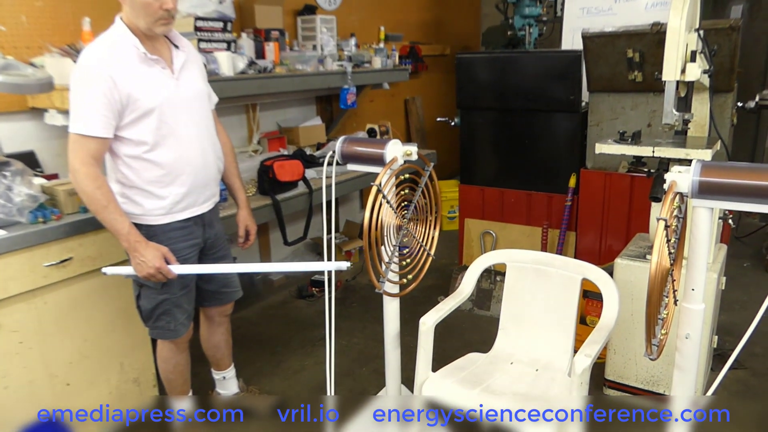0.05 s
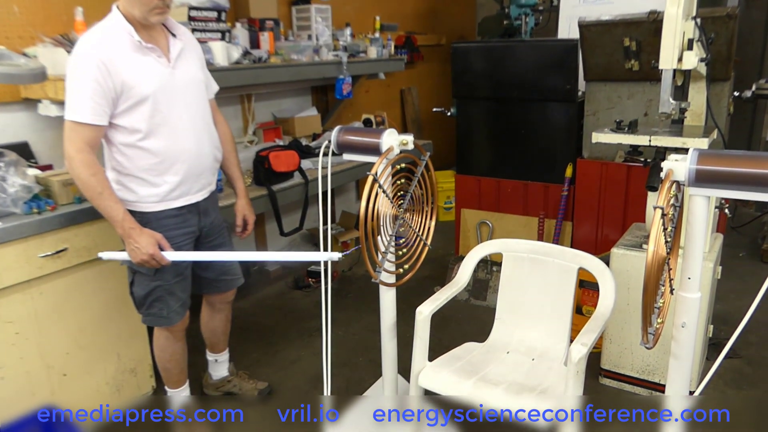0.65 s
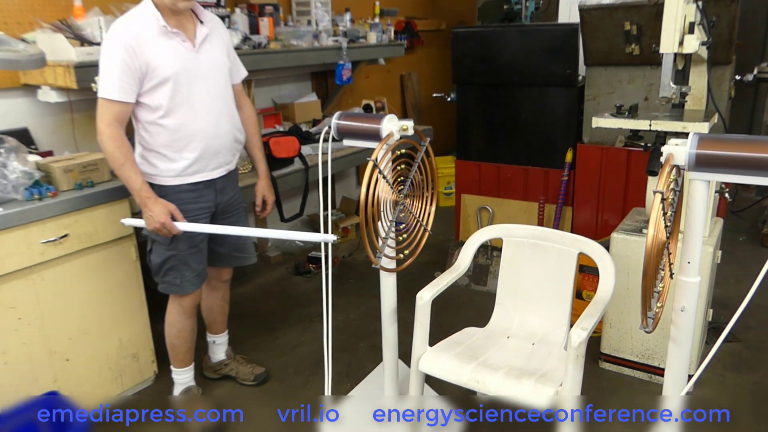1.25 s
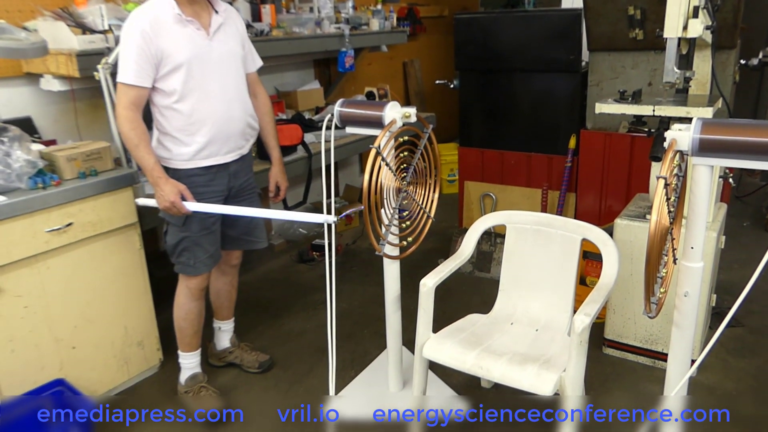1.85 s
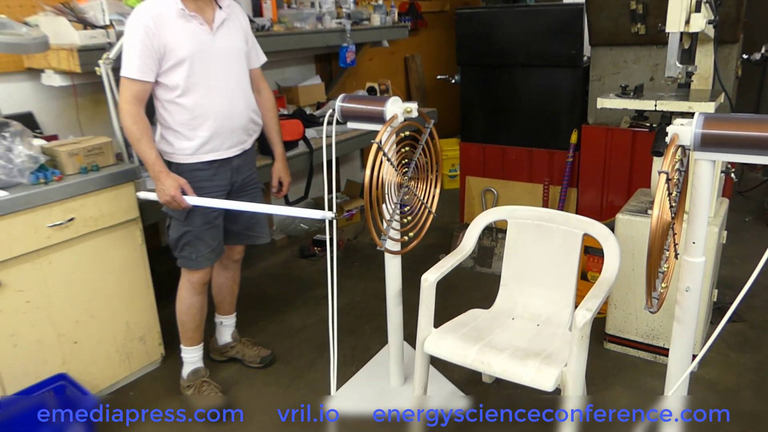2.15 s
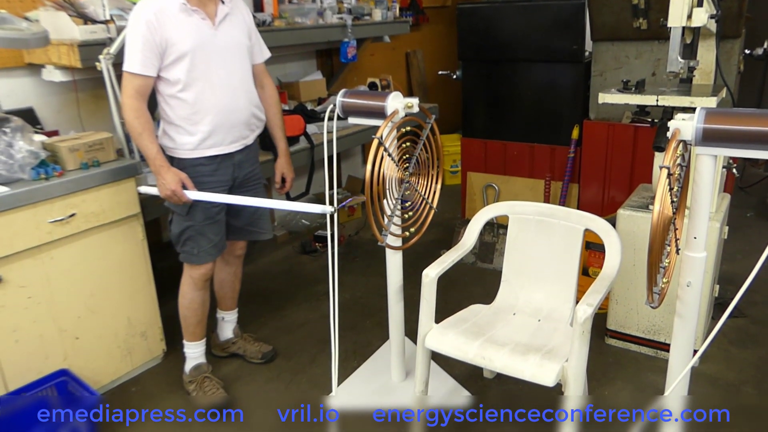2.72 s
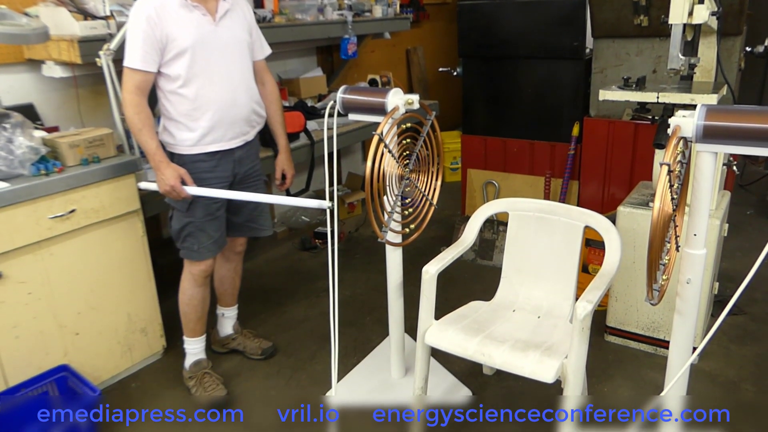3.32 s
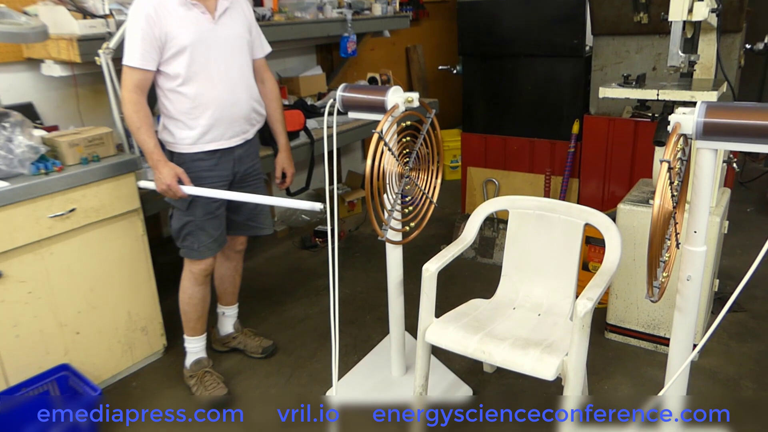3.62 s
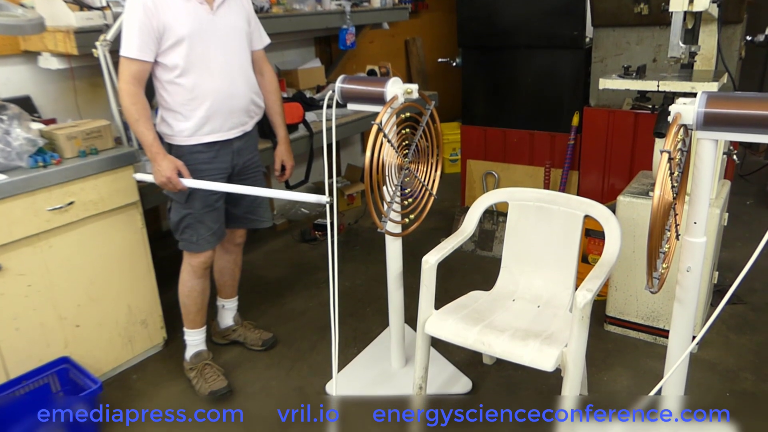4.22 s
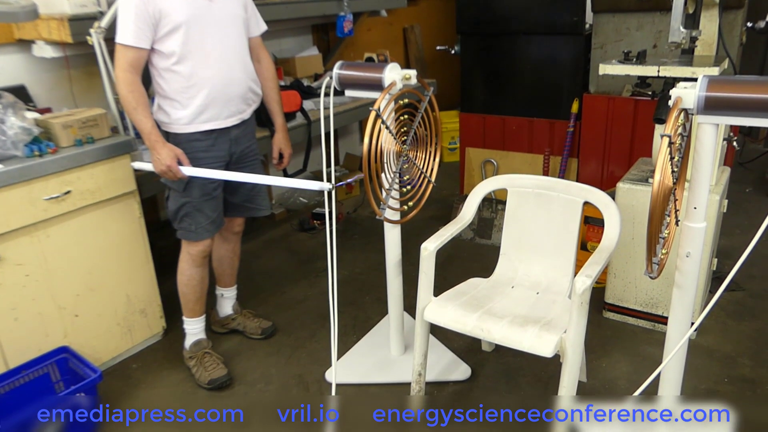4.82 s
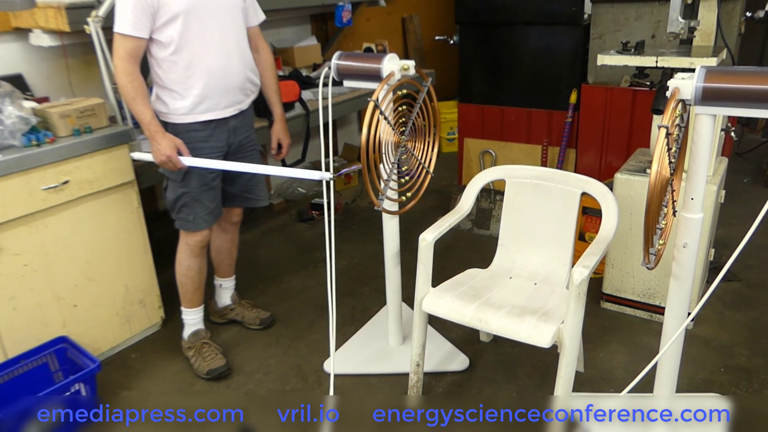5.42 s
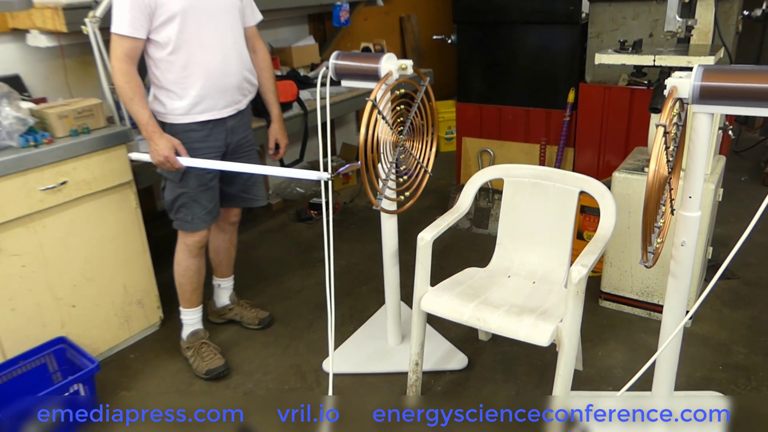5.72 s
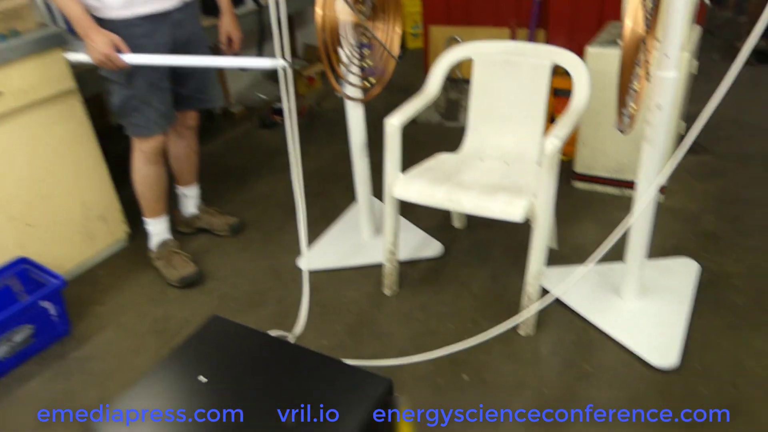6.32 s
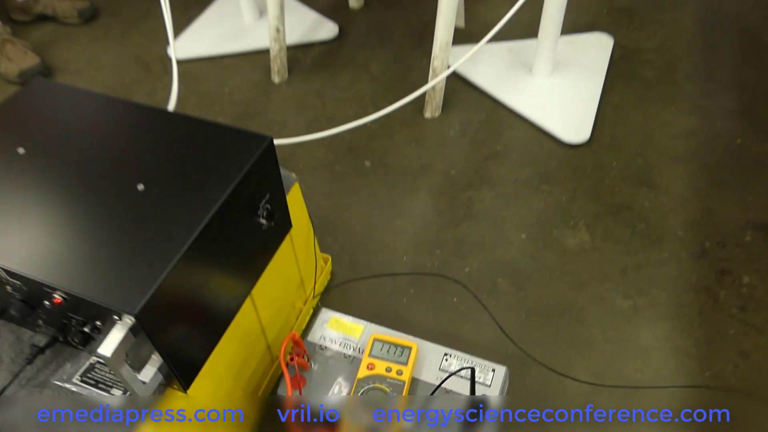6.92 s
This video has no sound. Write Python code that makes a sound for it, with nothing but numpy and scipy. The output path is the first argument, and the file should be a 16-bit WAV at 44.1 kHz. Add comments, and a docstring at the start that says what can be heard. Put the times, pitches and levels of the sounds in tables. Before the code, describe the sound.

Electric arcs sizzle and crackle in repeated bursts over a spark gap's steady hiss and a faint machine hum.

```python
"""A workshop with a spark-gap coil running. The gap hisses steadily while a hand-held tube draws sizzling
arcs from the coil: each arc strikes, burns for a moment and breaks, leaving thin streamers. The sparks
pulse with the mains and the hard room answers. A machine hums faintly, and two low bumps come just
before the last arc dies."""
import sys
import numpy as np
from scipy import signal
from scipy.fft import rfft, irfft, next_fast_len
from scipy.io import wavfile
from scipy.ndimage import uniform_filter1d, map_coordinates

SR = 44100
rng = np.random.default_rng(int(sys.argv[2]) if len(sys.argv) > 2 else 0)


def unload_wav(signal):
    """Save mono or channel-first audio to the path in sys.argv[1] as 16-bit WAV at rate SR, clipped to [-1, 1]."""
    wavfile.write(
        sys.argv[1],
        SR,
        np.round(np.clip(np.atleast_2d(signal).T, -1, 1) * 32767).astype(np.int16),
    )


N = 306495
TOP_HZ = 15720  # upper edge of the sound

# Spells with the tube near enough for thin streamers. Each row: start and end in seconds, level in dB.
STREAMERS = [(0.0, 0.945, -31), (1.236, 3.395, -34), (4.23, 6.575, -32)]


def amp(db):
    """Decibels to gain."""
    return 10 ** (np.asarray(db) / 20)


def unit(x):
    """Scale to rms 1."""
    return x / np.sqrt(np.mean(x ** 2) + 1e-20)


def clock():
    """The time of every sample, in seconds."""
    return np.arange(N) / SR


def along(points, hz):
    """Read (Hz, value) points on a log frequency axis."""
    freqs, values = np.transpose(points)
    return np.interp(np.log(hz + 1), np.log(freqs + 1), values)


def curves(rows):
    """Automation lanes: one value per sample for each column after the time."""
    times, *columns = np.transpose(rows)
    return [np.interp(clock(), times, column) for column in columns]


def wobble(rate):
    """A smooth random curve with `rate` knots a second."""
    knots = rng.standard_normal(int(N * rate / SR) + 4)
    return map_coordinates(knots, [np.arange(N) * rate / SR])


def coloured(x, db_at):
    """Causal EQ with the gain db_at(Hz), so that clicks keep their sharp front."""
    size = 2 * next_fast_len(N // 2 + SR // 4)
    cepstrum = irfft(np.log(amp(db_at(np.fft.rfftfreq(size, 1 / SR)))), size)
    cepstrum[1:size // 2] *= 2  # fold onto positive times: minimum phase
    cepstrum[size // 2 + 1:] = 0
    return irfft(rfft(x, size) * np.exp(rfft(cepstrum)), size)[..., :N]


def diffuse(size):
    """Stereo noise arriving from all around, wide in the bass and narrower higher up."""
    # Stereo image of the room. Each row: frequency in Hz, left-right correlation.
    likeness = [(60, -0.24), (150, -0.51), (350, -0.61), (700, 0.48), (1400, 0.47), (3500, 0.73),
                (8000, 0.81), (15000, 0.29)]
    correlation = np.clip(along(likeness, np.fft.rfftfreq(size, 1 / SR)), -1, 1)
    angle = np.arccos(correlation) / 2
    noise = rfft(rng.standard_normal((2, size)))
    mid, side = irfft(noise * [np.cos(angle), np.sin(angle)], size)
    return np.array([mid + side, mid - side])


def room_tail():
    """One stereo reverb tail of the cluttered room; its treble dies sooner."""
    # What the room throws back. Each row: frequency in Hz, relative level in dB.
    reflection = [(300, -2.5), (5000, -2), (9000, 0.55), (15000, -1.5)]
    # How long it rings. Each row: frequency in Hz, seconds to fall by 60 dB.
    decay = [(150, 0.33), (1000, 0.3), (4000, 0.33), (9000, 0.2), (15000, 0.2)]
    hz, t, spectrum = signal.stft(diffuse(SR // 2), SR, nperseg=256)
    fade = amp(along(reflection, hz)[:, None] - 60 * t / along(decay, hz)[:, None])
    tail = signal.istft(spectrum * fade, SR, nperseg=256)[1]
    return tail / np.linalg.norm(tail[0])


def workshop(x, wet_db, steady=.24, patterns=22):
    """Direct sound plus reverb at about equal overall power; the echo pattern shifts as sparks move."""
    hop = N // patterns + 1
    lasting = room_tail()
    wet = np.zeros((2, N + SR))
    for start in range(0, N, hop):
        tail = steady * lasting + np.sqrt(1 - steady ** 2) * room_tail()
        piece = signal.fftconvolve(x[None, start:start + hop], tail, axes=1)
        wet[:, start:start + piece.shape[1]] += piece
    return (x + amp(wet_db) * wet[:, :N]) / np.hypot(1, amp(wet_db))


def machine_hum(note_hz=265, note_trim_db=-1.0, rumble_db=-57, rumble_follows=0.29):
    """A machine's faint, wavering note over an uneven low rumble that swells with it."""
    # The machine's strength. Each row: time in seconds, level in dB.
    strength = [(0.0, -64), (1.64, -59.5), (2.24, -65), (3.54, -65), (4.53, -55.5), (4.61, -65.5),
                (6.95, -73)]
    # Tone of the rumble. Each row: frequency in Hz, relative level in dB.
    rumble_tone = [(20, -16), (60, -7), (110, 1.5), (170, -3), (300, 3), (500, -14.5), (1000, -27),
                   (4000, -39)]
    strength_db, = curves(strength)
    phase = 2 * np.pi * np.cumsum(note_hz + 1.57 * wobble(9)) / SR
    note = unit(np.sin(phase)) * amp(strength_db + note_trim_db + 1.3 * wobble(6.3))
    rumble = coloured(diffuse(N), lambda hz: along(rumble_tone, hz))
    rumble = unit(rumble * amp(2.1 * wobble(12)))
    swell_db = rumble_follows * (strength_db - strength_db.mean())
    return note + rumble * amp(rumble_db + swell_db)


def bumps(push_s=0.0004):
    """Dull low knocks, each a single push of air."""
    # The knocks. Each row: start in seconds, level in dB.
    knocks = [(6.552, -35), (6.568, -30)]
    push = np.zeros(N)
    for start, db in knocks:
        age = np.maximum(clock() - start, 0) / push_s
        push += amp(db) * np.e * age * (2 - age) * np.exp(-age)
    return workshop(push, wet_db=-6, patterns=1)


def sparks(rate, tone, scatter, spread_db, mains_db, unrest=.16, mains_hz=60):
    """Crackle: charge builds and breaks down at uneven moments, harder on each crest of the mains."""
    charge = np.cumsum(rate * np.exp(unrest * wobble(40))) / SR
    firings = np.arange(int(charge[-1]))
    late, size = rng.standard_normal((len(firings), 2)).T
    at = np.interp(firings + scatter * late, charge, np.arange(N)).astype(int)
    crest = np.cos(2 * np.pi * 2 * mains_hz * at / SR)  # two crests per cycle
    clicks = np.bincount(at, amp(spread_db * np.clip(size, -2, 2) + mains_db * crest), N)
    # the supply's power is steady, so fewer sparks are stronger sparks
    power = np.abs(uniform_filter1d(clicks ** 2, size=SR // 20))
    clicks = clicks / np.sqrt(power + 1e-9)
    return coloured(clicks - clicks.mean(), lambda hz: along(tone, hz) - 60 * (hz > TOP_HZ + 500))


def burning(start, end, attack_s=0.0011, release_s=0.0081):
    """A discharge's envelope: the channel heats up, holds and dies away after the break."""
    t = clock()
    attack = 1 - np.exp(-np.maximum(t - start, 0) / attack_s)
    return attack * np.exp(-np.maximum(t - end, 0) / release_s)


def spark_gap(whistle_db=-14.0, whistle_hz=3330, whistle_width_hz=340, build_s=.2):
    """The coil's gap fires fast and fine; an airy whistle builds in its hiss while nothing is drawn."""
    # The gap's fader. Each row: time in seconds, level in dB.
    fader = [(0, -28), (1.1, -32), (3.5, -37), (4.2, -32), (4.7, -37.5), (6.3, -36), (6.68, -39.5),
             (6.95, -37)]
    # Tone of the hiss. Each row: frequency in Hz, relative level in dB.
    hiss_tone = [(100, -33.5), (400, -9), (700, -7.5), (1200, -9), (1600, -6.5), (2600, -8.5), (3300, -3),
                 (4200, -4.5), (5800, -2.5), (8200, -5), (9500, 2.5), (11300, -1.5), (13500, 0.5),
                 (15500, -3)]
    level_db, = curves(fader)
    hiss = unit(sparks(np.full(N, 2600), hiss_tone, scatter=.5, spread_db=4.5, mains_db=1.5))
    unloaded = 1 - np.max([burning(start, end) for start, end, _ in STREAMERS], axis=0)
    step = 1 / (build_s * SR)
    build_up = signal.lfilter([step], [1, step - 1], unloaded)
    phase = 2 * np.pi * whistle_hz * clock()
    whistle = unit(wobble(whistle_width_hz) * np.cos(phase) + wobble(whistle_width_hz) * np.sin(phase))
    mix = hiss + amp(whistle_db) * build_up * whistle
    return workshop(mix * amp(level_db + 0.12 * wobble(25)), wet_db=5.0)


def discharge(strike_db=2.5, settle_s=0.058, sag_db_per_s=3.5):
    """Level and freshness of what burns hardest: an arc that flares, settles and sags, or streamers."""
    # Arcs drawn to the tube. Each row: strike and break in seconds, base level in dB.
    strikes = [(0.0, 0.113, -24), (0.169, 0.322, -23.5), (0.365, 0.443, -24.5), (0.48, 0.6, -24),
               (0.673, 0.923, -22), (1.375, 1.455, -29.5), (1.456, 1.626, -20.5), (1.648, 2.107, -21),
               (2.196, 2.34, -23.5), (2.397, 2.404, -24.5), (2.421, 2.522, -24), (2.6, 2.804, -22.5),
               (2.944, 3.046, -24), (3.101, 3.101, -23.5), (3.232, 3.344, -23.5), (4.28, 4.39, -28),
               (4.417, 4.51, -27), (4.502, 4.549, -21), (4.575, 4.66, -24.5), (4.791, 4.922, -23.5),
               (5.019, 5.215, -23.7), (5.275, 5.58, -23), (5.615, 5.787, -24.5), (5.786, 6.09, -23),
               (6.138, 6.328, -24), (6.39, 6.574, -23.5)]
    level = np.max([amp(db) * burning(start, end) for start, end, db in STREAMERS], axis=0)
    fresh = np.zeros(N)
    for start, end, db in strikes:
        age = np.maximum(clock() - start, 0)
        flare = np.exp(-age / settle_s)
        arc = burning(start, end) * amp(db + strike_db * flare - sag_db_per_s * age)
        fresh = np.where(arc > level, flare, fresh)
        level = np.maximum(level, arc)
    return level, fresh


def arcs(trim_db=0.22, snap_db=1.5, full_arc_db=-24, body_per_db=5.5, ring_hz=2950, ring_width_hz=150):
    """Each arc snaps on bright, sizzles with a biting ring and breaks off, leaving the streamers."""
    # How it burns. Each row: time in seconds, mean sparks per second, body gain in dB, ring gain in dB.
    burn = [(0.5, 1370, 3, -1), (1.6, 1350, 1.5, 0.5), (2.6, 980, -2.5, -0.5), (4.35, 1006, 0.5, 6),
            (4.7, 620, -3.5, 2), (6.6, 582, -2.5, 1)]
    # Tone of the crackle. Each row: frequency in Hz, relative level in dB.
    crackle_tone = [(60, -57), (200, -13.5), (400, -10.5), (540, -12.5), (660, -5.5), (1150, -4.5),
                    (1650, -3.5), (3000, -0.5), (5500, 1.5), (8200, -1), (9600, 2), (12000, -1.3),
                    (15500, -1)]
    level, fresh = discharge()
    rate, body_db, ring_db = curves(burn)
    # a discharge weaker than a full arc is longer, which gives it up to 3 dB more body
    weaker_db = full_arc_db - 20 * np.log10(level + 1e-9)
    body_db = body_db + np.clip(body_per_db * weaker_db, 0, 3)
    crackle = sparks(rate, crackle_tone, scatter=.26, spread_db=3.0, mains_db=2.5)
    body = signal.sosfilt(signal.butter(1, 2000, fs=SR, output="sos"), crackle)
    edge = signal.sosfilt(signal.butter(1, 11000, "high", fs=SR, output="sos"), crackle)
    ring = signal.lfilter(*signal.iirpeak(ring_hz, ring_hz / ring_width_hz, fs=SR), crackle)
    # every spark takes a new crooked path, which makes its crack sharper or duller
    edge_db = snap_db * fresh + 3 * np.clip(wobble(600), -2, 2) + 0.5
    for band, gain_db in (body, body_db), (edge, edge_db), (ring, ring_db):
        crackle = crackle + (amp(gain_db) - 1) * band
    return workshop(unit(crackle) * level * amp(trim_db + 0.25 * wobble(45)), wet_db=2.5)


def scene():
    """Arcs over the gap's hiss, the hum and the bumps, all from about straight ahead."""
    return arcs() + spark_gap() + machine_hum() + bumps()


def record(dry):
    """The sound's path adds narrow peaks and notches, and the very top is cut off."""
    # The peaks and notches. Each row: centre in Hz, width in Hz, gain in dB.
    bells = [(480, 40, 3.5), (635, 40, 2.5), (716, 35, 3), (1200, 110, -3), (1635, 50, 2.5),
             (2280, 70, 4.5), (3030, 110, 3), (4580, 60, 2), (7500, 80, -11)]

    def eq_db(hz):
        return sum(db / (1 + (2 * (hz - centre) / width) ** 2) for centre, width, db in bells)

    size = next_fast_len(N + SR // 2)
    passband = np.fft.rfftfreq(size, 1 / SR) < TOP_HZ
    return irfft(rfft(coloured(dry, eq_db), size) * passband, size)[:, :N]


dry = scene()
out = record(dry)
unload_wav(out)
```